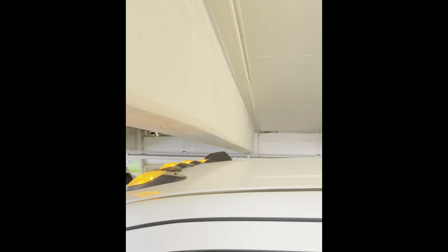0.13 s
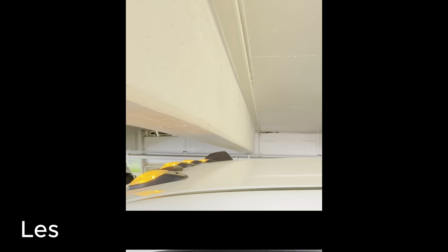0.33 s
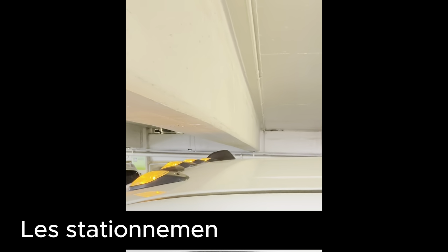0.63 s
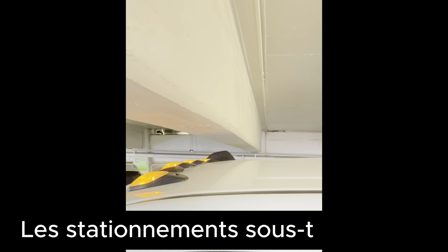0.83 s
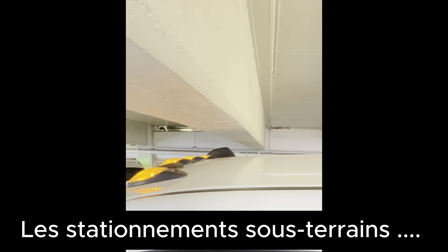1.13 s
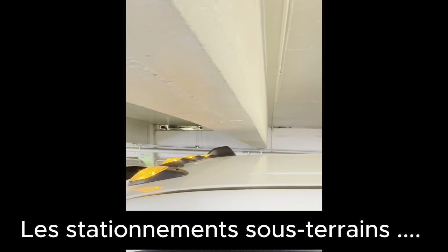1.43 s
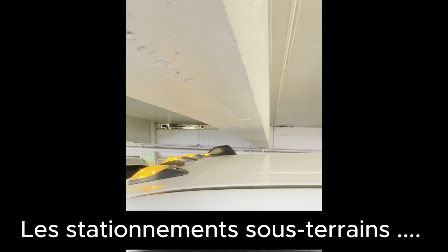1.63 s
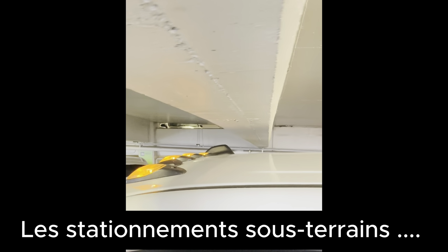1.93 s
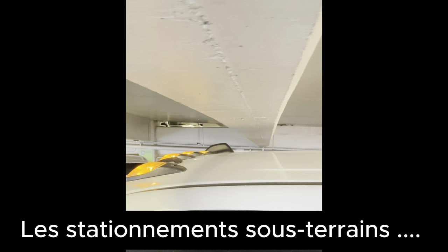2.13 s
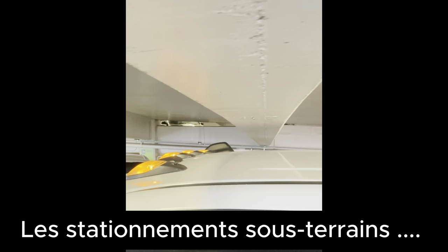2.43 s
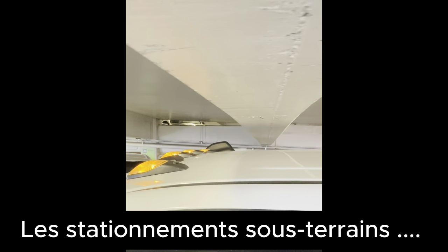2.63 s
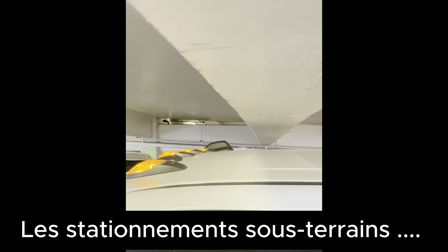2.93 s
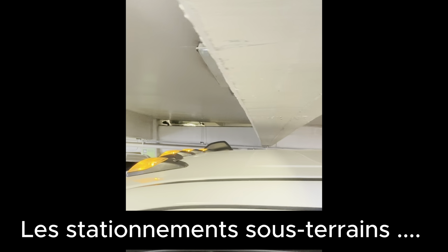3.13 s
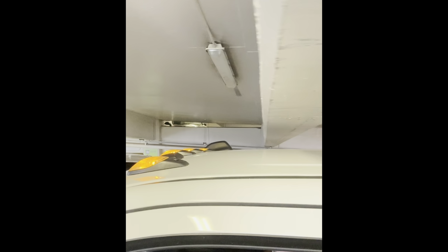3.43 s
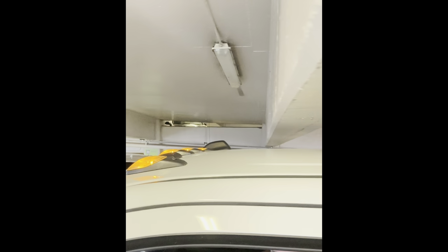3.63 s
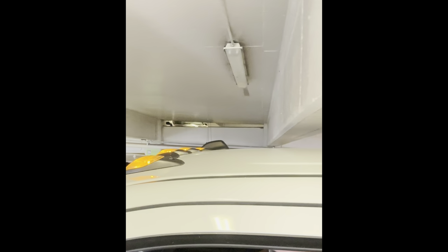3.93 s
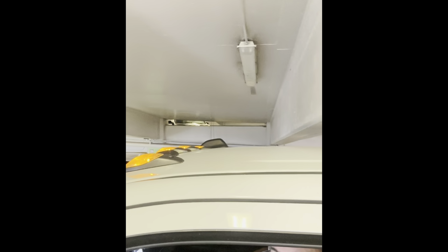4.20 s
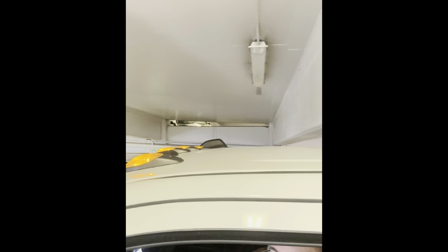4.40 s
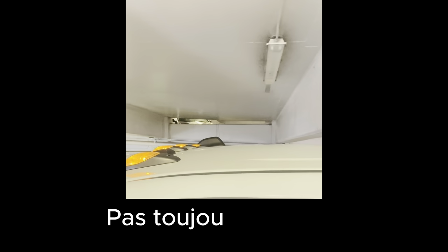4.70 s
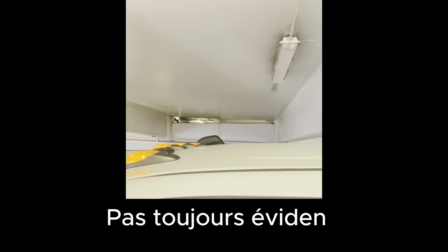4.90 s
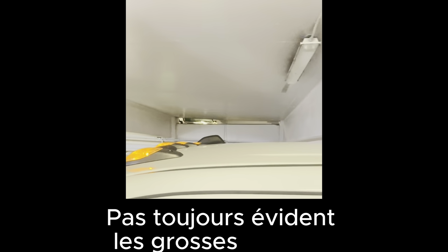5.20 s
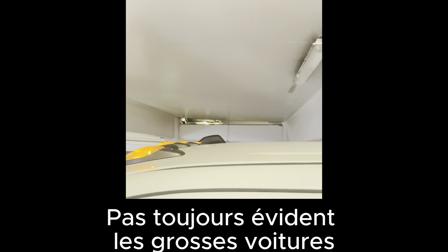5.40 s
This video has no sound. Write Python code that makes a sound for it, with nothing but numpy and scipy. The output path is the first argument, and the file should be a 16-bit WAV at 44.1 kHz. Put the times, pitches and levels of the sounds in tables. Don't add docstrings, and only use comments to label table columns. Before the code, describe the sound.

Heavy low diesel rumble heard at an open cab window, with a gliding pump moan, engine-bay hiss, small ticks and a soft tyre thud.

```python
import sys
import numpy as np
from scipy import signal
from scipy.io import wavfile
from scipy.ndimage import uniform_filter1d

SR = 44100
rng = np.random.default_rng(int(sys.argv[2]) if len(sys.argv) > 2 else 0)


def volts_from_decibels(level):
    exponent = np.asarray(level, float) / 20
    return 10 ** exponent


def to_wav(s):
    ch = np.atleast_2d(s).T
    pcm = np.round(np.clip(ch, -1, 1) * 32767)
    wavfile.write(sys.argv[1], SR, pcm.astype(np.int16))


N = 244887

CYCLE_HZ = 8.075
FAN_HZ = 14.0


def evened(x):
    return x / np.sqrt(np.mean(x ** 2) + 1e-20)


def read(points, hz):
    f, *values = np.transpose(points)
    return np.array([np.interp(np.log(hz + 1), np.log(f + 1), v) for v in values])[..., None]


def curves(rows):
    s, *columns = np.transpose(rows)
    return [np.interp(np.arange(N) / SR, s, column) for column in columns]


def drift(top_hz):
    t = np.arange(0, N + 256, 256) / SR
    hz = np.geomspace(.1, top_hz, num=16)[:, None]
    waves = np.sin(2 * np.pi * (hz * t + rng.random(hz.shape)))
    slow = (waves / np.sqrt(hz)).sum(0)
    return np.interp(np.arange(N) / SR, t, evened(slow))


def tone(hz, db):
    turns = np.cumsum(hz * np.ones(N)) / SR + rng.random()
    return np.sqrt(2) * volts_from_decibels(db) * np.sin(2 * np.pi * turns)


def orders(shaft_hz, table, wander_db):
    return sum(tone(k * shaft_hz, db + wander_db * drift(1.7)) for k, db in table)


def swell(s, half_s):
    t = np.arange(N) / SR
    return np.exp(-((t - s) / half_s) ** 2)


def flutter(width_hz, share):
    smooth = signal.butter(2, [width_hz / 6, width_hz], "band", fs=SR / 256, output="sos")
    slow = evened(signal.sosfilt(smooth, rng.standard_normal((2, N // 256 + 2))))
    re, im = slow.repeat(256, axis=1)[:, :N]
    echoes = uniform_filter1d(re, size=256) + 1j * uniform_filter1d(im, size=256)
    return np.sqrt(1 - share) + np.sqrt(share / 2) * echoes


def opened():
    open_s, opening_s = 2.95, .1
    return .5 + .5 * np.tanh((np.arange(N) / SR - open_s) / opening_s / 2)


def whines():
    # pitch_hz, level_db
    fuel_whines = [(9535, -86), (9665, -86), (2542, -66), (1714, -60)]
    thin = sum(tone(hz * (1 + .0002 * drift(4)), db + 2.2 * drift(10)) for hz, db in fuel_whines)
    band = signal.butter(2, [6500, 6650], "band", fs=SR, output="sos")
    whistle_mid, whistle_side = [evened(signal.sosfilt(band, rng.standard_normal(N))) * volts_from_decibels(db)
                                 for db in (-66, -61)]
    return np.array([thin + whistle_mid, .3 * thin + whistle_side])


def low_roar_db():
    t = np.arange(N) / SR
    beam_s, roar_db, rise_db_per_s, open_db = 2.6, -25, 1.15, -29.5
    near = roar_db - rise_db_per_s * np.maximum(beam_s - t, 0)
    far = open_db - .4 * (t - 4.2)
    return near + (far - near) * opened()


def roar():
    # pitch_hz, level_db (per Hz)
    rumble = [(18, -31), (40, -26.5), (55, -11.5), (75, -1.5), (100, -4), (135, -8.5), (170, -5.5),
              (260, -9), (400, -9.5), (520, -14), (700, -13.5), (900, -28), (1300, -55.5)]
    # pitch_hz, level_db (per Hz)
    hiss_mid = [(450, -17.5), (900, -1.5), (2100, -5), (2330, -7), (2600, -11), (4500, -20), (6800, -30.5),
                (7100, -40.5), (7500, -70), (8850, -72), (9050, -40), (11000, -44.5), (14200, -53),
                (15200, -73.5)]
    # pitch_hz, level_db (per Hz)
    hiss_side = [(40, -22.5), (110, -5.5), (190, -8.5), (500, -6.5), (1200, -4), (2000, -11.5), (2300, -18),
                 (2550, -9.5), (3200, -15.5), (3800, -23.5), (6800, -30), (10100, -45.5), (12600, -81),
                 (14200, -54.5)]
    # pitch_hz, depth_db
    patchy = [(300, -0.04), (1000, 0.27), (2300, 2), (4500, 0.97)]
    # pitch_hz, share of side in step with mid, share a quarter turn ahead
    lean = [(90, .62, .62), (200, .65, .3), (480, .43, 0.0), (750, -.05, 0.0), (1500, -.18, .12),
            (3000, .08, .06), (4800, .12, -.12), (6500, .03, -.7), (7500, .1, 0.0), (9300, .05, .52),
            (11000, 0.0, 0.0), (13500, 0.0, -.33)]
    hiss_mid_db, hiss_side_db = -36.5, -36.5

    frames, hz = N // 512 + 6, np.fft.rfftfreq(2048, 1 / SR)
    a, b, c, d, patches, ripple = rng.standard_normal((frames, 1025, 6)).T
    patches = uniform_filter1d(patches, size=14, axis=0)
    patches = evened(uniform_filter1d(patches, size=7, axis=1))
    ripple = uniform_filter1d(ripple, size=2, axis=0)
    ripple = evened(uniform_filter1d(ripple, size=40, axis=1))
    gain = volts_from_decibels(read(patchy, hz)[0] * patches + 1.42 * ripple)
    gain *= volts_from_decibels(-5 * np.exp(-((hz - 2310) / 45) ** 2))[:, None]

    in_step, ahead = np.clip(read(lean, hz), -.7, .7)
    shared, separate = a + 1j * b, c + 1j * d
    apart = np.sqrt(1 - in_step ** 2 - ahead ** 2)
    side_noise = (in_step + 1j * ahead) * shared + apart * separate
    z = np.array([shared * volts_from_decibels(read(rumble, hz)[0]) * (hz < 3000)[:, None],
                  shared * volts_from_decibels(read(hiss_mid, hz)[0]),
                  side_noise * volts_from_decibels(read(hiss_side, hz)[0])])
    sounds = signal.istft(z * gain, nperseg=2048, noverlap=1536)[1][:, :N]
    low, mid, side = map(evened, sounds)
    return np.array([low * volts_from_decibels(low_roar_db() + 0.5) + mid * volts_from_decibels(hiss_mid_db), side * volts_from_decibels(hiss_side_db)])


def burst(s, db, hz, cycles, rough):
    t = np.arange(N) / SR - s
    u = np.clip(t * hz / cycles, 0, 30)
    ring = np.sin(2 * np.pi * hz * t) + rough * rng.standard_normal(N)
    return volts_from_decibels(db) * np.e * u * np.exp(-u) * ring


def knocks():
    # start_s, peak_db
    ticks = [
        (.8243, -39),
        (.9928, -27.5),
    ]
    # pitch_hz, level_db
    trim = [(4600, 4), (6800, -2), (9300, -1), (13400, -8)]
    # start_s, peak_db, pitch_hz
    thud = (3.086, -12.5, 210)
    ring_s = .00011
    right = sum(burst(s, db + ring_db, hz, hz * ring_s, .05) for s, db in ticks for hz, ring_db in trim)
    left = .6 * np.roll(right, shift=10)
    return np.array([left + right + 2 * burst(*thud, cycles=.8, rough=0), left - right]) / 2


def pump_levels_db(hz):
    resting_db = [-37.5, -43, -45, -46]
    # middle_s, half_length_s, lift_db
    swells = [
        [(.1, 0.22, 13), (1.15, 0.32, 9), (2.1, 0.12, 5.5), (2.6, 0.17, 10.5), (3.5, 0.41, 14),
         (4.07, .12, 7.5), (4.5, .25, 7.5)],
        [(.45, 0.27, 16.5), (.92, 0.15, 10), (1.2, .2, 12.5), (2.15, .2, 10), (2.6, 0.18, 12.5),
         (3.15, 0.088, 9), (4.05, 0.18, 8.5)],
        [(.2, .2, 5.5), (.62, 0.29, 10.5), (2.1, .25, 13.5), (2.6, .15, 14.5), (2.95, .25, 13.5),
         (3.65, 0.11, 8.5), (4.05, .1, 7.5), (4.65, 0.22, 5.5)],
        [(.75, .08, 8.5), (1.2, 0.25, 6), (1.75, .15, 7.5), (2.1, 0.13, 3.5), (2.33, 0.075, 5.5),
         (2.62, .16, 8), (2.85, 0.16, 6)],
    ]
    slip = uniform_filter1d(abs(np.gradient(hz)) * SR, size=2000)
    return [db - .03 * slip + sum(lift_db * swell(s, half_s) for s, half_s, lift_db in rows)
            for db, rows in zip(resting_db, swells)]


def pump():
    # start_s, pitch_hz
    glide = [(0, 122), (.6, 131), (1.15, 143.9), (1.45, 151.2), (1.75, 163.5), (2.15, 165.4), (2.41, 171.8),
             (2.45, 133), (2.95, 123), (3.4, 120.7), (4.05, 124.8), (4.65, 128.8), (5.55, 128)]
    hz = curves(glide)[0]
    levels_db = pump_levels_db(hz)
    turn = 2j * np.pi * np.cumsum(hz * (1 + 0.0039 * drift(12))) / SR
    levels_db += [levels_db[-1] - 0.5, levels_db[-1] - 7.0]
    parts = [np.sqrt(2) * volts_from_decibels(db) * np.exp((k + 1) * turn) for k, db in enumerate(levels_db)]
    mid = [part * flutter(12, .25) for part in parts]
    side = sum(volts_from_decibels(-22.5 + 3.0 * k) * (m + .7 * part * flutter(9, .9))
               for k, (part, m) in enumerate(zip(parts, mid)))
    return np.array([sum(mid), side]).real


def fan():
    # multiple, level_db
    fan_orders = [(2.5, -51.5), (3, -43.5), (6, -35), (7, -44.5), (8, -47), (9, -43.5), (9.55, -37),
                  (10, -35), (12, -44.5), (16, -43.5)]
    open_db = -3
    return orders(FAN_HZ, fan_orders, wander_db=2.0) * volts_from_decibels(open_db * (opened() - .5))


def uneven_cylinders():
    # multiple, level_db
    cycle_orders = [(3, -56), (6, -37.5), (10, -37.5), (13, -38.5), (15, -42), (20, -50)]
    return orders(CYCLE_HZ, cycle_orders, wander_db=3.0)


def neighbours():
    # pitch_hz, level_db under the beams, level_db in the open
    close = [
        (7 * CYCLE_HZ, -31, -32),
        (5 * FAN_HZ, -26, -33),
        (9 * CYCLE_HZ, -25.5, -29.5),
    ]
    return sum(tone(hz, db + (open_db - db) * opened() + 1.1 * drift(1.7)) for hz, db, open_db in close)


def blooms():
    # pitch_hz, middle_s, half_length_s, peak_db
    rows = [
        (7 * CYCLE_HZ, 5.4, .3, -21),
        (13 * CYCLE_HZ, 2.5, .8, -29.5),
        (6 * FAN_HZ, .25, .5, -30),
        (6 * FAN_HZ, 4.3, .9, -32),
    ]
    return sum(tone(hz, db) * swell(s, half_s) for hz, s, half_s, db in rows)


def firing():
    # start_s, level_db
    boom = [(0.0, -11.5), (0.4, -10), (0.7, -11.5), (1.1, -13), (1.5, -14.5), (1.75, -10.5), (2.15, -14.5),
            (2.6, -11.5), (3.4, -9.5), (3.8, -10.5), (4.05, -12.5), (4.5, -12), (4.85, -17.5),
            (5.55, -17.5)]
    # middle_s, half_width_s, share left (negative: pitch dips)
    nulls = [
        (0.86, .11, -.27),
        (4.99, .07, .33),
        (5.3, .13, -.25),
    ]
    t = np.arange(N) / SR
    hz = 8 * CYCLE_HZ * (1 + 0.028 * np.exp(-t / .3) + 0.0032 * drift(3.1))
    heard = volts_from_decibels(curves(boom)[0]) * np.sqrt(2) + 0j
    for s, width_s, left in nulls:
        u = (t - s) / width_s
        heard = heard * (u ** 3 - 1j * left + abs(left) * u) / np.sqrt(1 + u ** 6)
    turn = np.exp(2j * np.pi * (np.cumsum(hz) / SR + .13))
    overtone = volts_from_decibels(-26) * abs(heard) * turn ** 2
    return (heard * turn + overtone).real


def engine():
    return firing() + neighbours() + blooms() + uneven_cylinders() + fan()


def scene():
    low = engine()
    across = .026 * low + 2.7 * np.gradient(low)
    mid, side = whines() + roar() + knocks() + pump() + np.array([low, across])
    return np.array([mid + side, mid - side])


def band_limit(x):
    return signal.sosfilt(signal.butter(12, 15600, fs=SR, output="sos"), x)


def record(dry):
    fade_s = .012
    left_s = np.arange(N)[::-1] / SR
    fade = np.sin(np.pi / 2 * np.minimum(left_s / fade_s, 1)) ** 2
    return band_limit(dry * fade)


dry = scene()
out = record(dry)
to_wav(out)
```